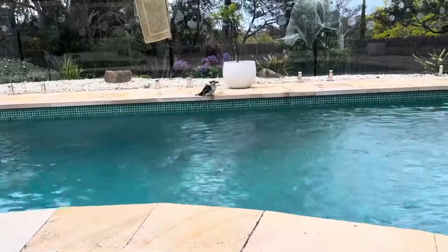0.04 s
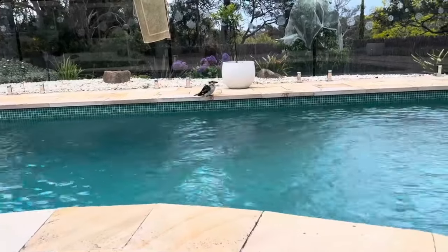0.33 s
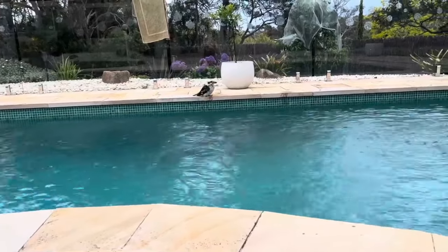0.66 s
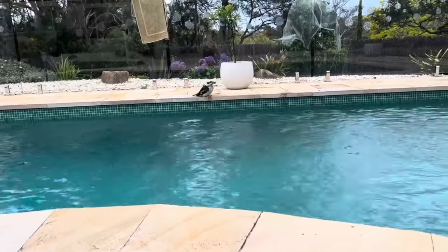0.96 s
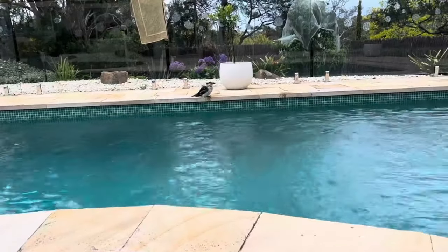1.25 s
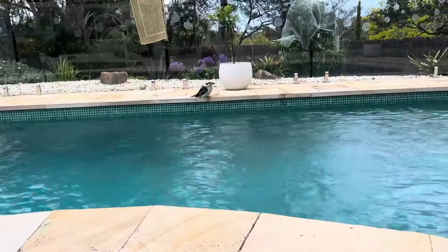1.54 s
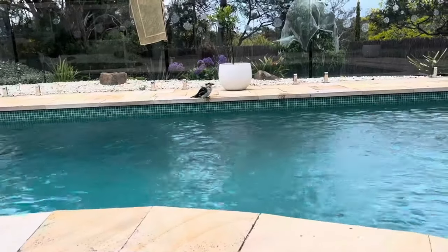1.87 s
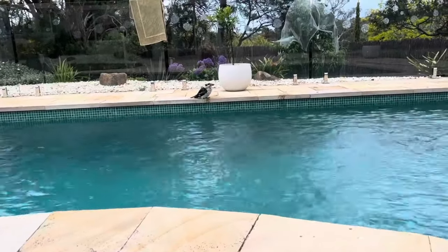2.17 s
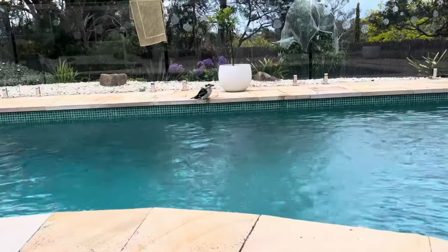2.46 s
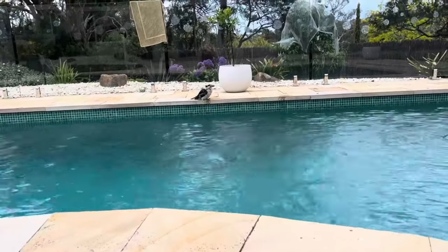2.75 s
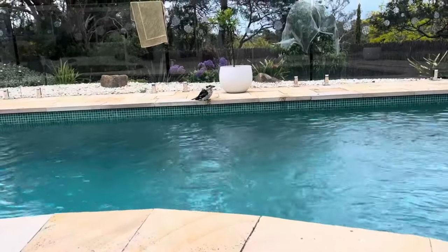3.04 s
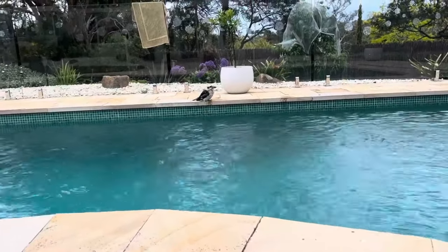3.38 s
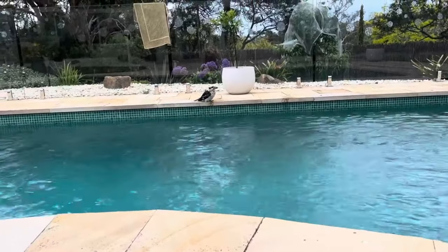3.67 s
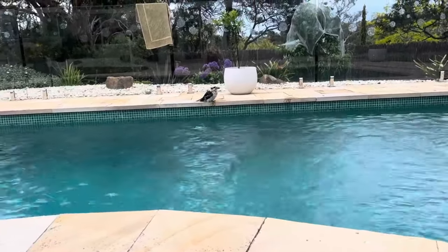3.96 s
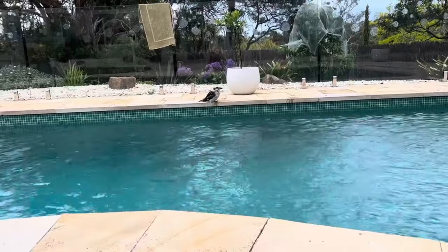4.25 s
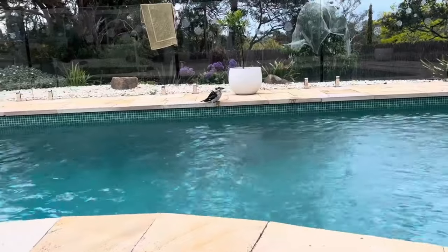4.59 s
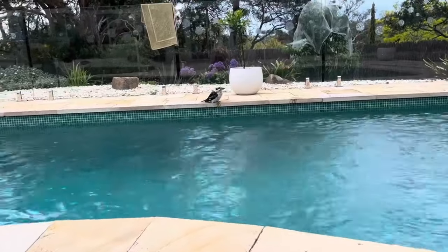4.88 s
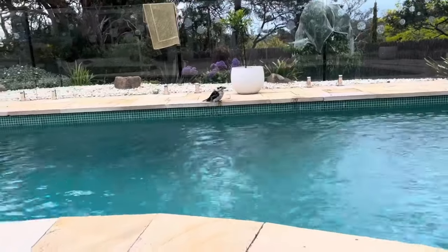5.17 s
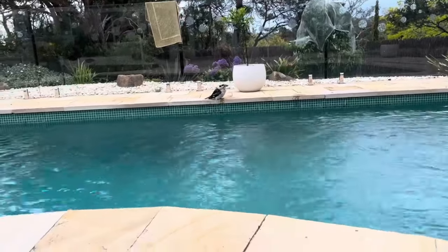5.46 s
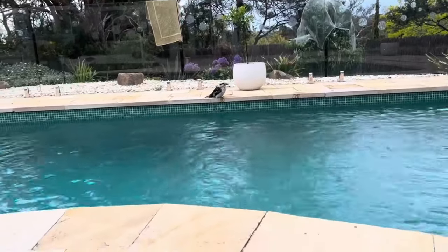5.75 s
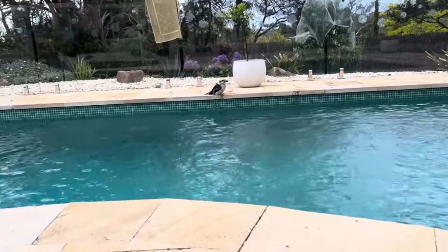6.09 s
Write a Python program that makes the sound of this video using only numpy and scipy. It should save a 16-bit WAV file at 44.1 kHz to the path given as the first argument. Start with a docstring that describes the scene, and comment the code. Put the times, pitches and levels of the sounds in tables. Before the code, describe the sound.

Beside a backyard pool, a pump hums steadily under a low rumble of distant traffic. A small bird repeats short, high, rising chirps that echo off the fence and walls, while a second answers more faintly from deeper in the garden. Faint ticks and soft handling bumps come and go. Near the end the hand-held microphone is briefly rubbed and tapped sharply three times, leaving the background quieter for a moment.

```python
"""Beside a backyard pool a pump hums under distant traffic. From the start a small bird chirps: each
note slurs upward, breaks to a higher pitch and reflects off fence and walls. A second bird answers,
heard mostly as scattered sound. Faint ticks and soft bumps come and go, and a high 'tsip' follows
at about 4 s. Near the end the microphone's case is rubbed, then three sharp taps excite its damped
modes, overload the microphone and pull its gain down."""
import sys
import numpy as np
from scipy import signal
from scipy.fft import rfft, irfft, next_fast_len
from scipy.io import wavfile
from scipy.ndimage import map_coordinates

SR = 44100
rng = np.random.default_rng(int(sys.argv[2]) if len(sys.argv) > 2 else 0)


def generate_wav(signal):
    """Clip the signal to [-1, 1] and save it as 16-bit WAV at the path in sys.argv[1]."""
    frames = np.transpose(np.atleast_2d(signal))
    scaled = np.clip(frames, -1, 1) * 32767
    pcm = np.round(scaled).astype(np.int16)
    wavfile.write(sys.argv[1], SR, pcm)


N = 269892


def amp(db):
    """Amplitude ratio of a level in decibels."""
    return 10 ** (np.asarray(db) / 20)


def unit(x):
    """Normalisation to an rms of 1."""
    return x / np.sqrt(np.mean(x ** 2) + 1e-20)


def along(points, hz):
    """Interpolation of (f/Hz, value) points on a logarithmic frequency axis."""
    f, v = np.transpose(points)
    return np.interp(np.log(hz + 1), np.log(f + 1), v)


def wobble(rate, size=N):
    """Smooth random modulation: a spline through `rate` Gaussian knots a second."""
    knots = rng.standard_normal(int(size * rate / SR) + 4)
    return map_coordinates(knots, [np.arange(size) * rate / SR])


def filtered(x, response):
    """Linear filtering: the spectrum of x is multiplied by a frequency response."""
    n = x.shape[-1]
    m = next_fast_len(n + SR // 8)
    return irfft(rfft(x, m) * response(np.fft.rfftfreq(m, 1 / SR)), m)[..., :n]


def add(track, s, sound):
    """Superposition of a sound on the track, starting at s seconds."""
    i = round(s * SR)
    part = sound[..., max(-i, 0):N - i]
    track[..., max(i, 0):max(i, 0) + part.shape[-1]] += part


def coloured_noise(size, spectrum):
    """Spectral shaping of white noise, at an rms of 1."""
    return unit(filtered(rng.standard_normal(size), lambda hz: amp(along(spectrum, hz))))


# Left-right coherence of the background: f/Hz, correlation coefficient
COHERENCE = [(60, .7), (250, .8), (600, .3), (1000, .15), (3000, .2), (8000, .5), (12000, .9)]
def stereo_noise(spectrum):
    """Partial coherence: the ratio of mid to side noise sets the correlation of the two channels."""
    def response(hz):
        angle = np.arccos(np.clip(along(COHERENCE, hz), -1, 1)) / 2
        return amp(along(spectrum, hz)) * [np.cos(angle), np.sin(angle)]
    mid, side = filtered(rng.standard_normal((2, N)), response)
    return unit(np.array([mid + side, mid - side]))


# Spectra of low rumble, distant traffic and hiss: f/Hz, relative level/dB
RUMBLE = [(12, -55), (20, -37.5), (40, -5), (60, -1.5), (129, -2), (162, -5.5), (209, -7), (241, -8.5),
          (274, -9), (303, -13.5), (335, -12), (600, -34.5), (780, -35), (1320, -120)]
TRAFFIC = [(150, -43), (330, -10), (480, -2.5), (650, -0.5), (900, 3), (1200, 0), (1500, -6), (2000, -12),
           (3000, -23), (4500, -28.5), (7000, -33.5), (12000, -68.5)]
HISS = [(2500, -8.5), (5000, 9), (7000, 2.5), (8500, 1), (9800, -41), (11500, 3.5), (14000, 5),
        (15500, -29), (17000, -45)]
def background(rumble_db=-38.5, traffic_db=-43, hiss_db=-74):
    """Random amplitude modulation: rumble, traffic and hiss each sway about a steady level."""
    rumble = amp(rumble_db + 1.27 * wobble(12)) * stereo_noise(RUMBLE)
    traffic = amp(traffic_db + 1.5 * wobble(7.6)) * stereo_noise(TRAFFIC)
    hiss = amp(hiss_db + wobble(21) + wobble(72)) * stereo_noise(HISS)
    return rumble + traffic + hiss


# Tones of the pump motor: f/Hz, level/dB
PUMP_TONES = [(62, -42.5), (104, -48.5), (202, -52), (274.3, -49)]
def pump(drift_hz=1.35, sway_db=2.5):
    """A motor radiates a line spectrum; each tone wavers slightly in frequency and amplitude."""
    tone = lambda hz: np.sin(2 * np.pi * np.cumsum(hz + drift_hz * wobble(9)) / SR)
    return sum(amp(db) * unit(tone(hz) * amp(sway_db * wobble(7.6))) for hz, db in PUMP_TONES)


# Spectrum of the rasp in a bird's voice: f/Hz, relative level/dB
RASP = [(1500, -26), (4000, 9.5), (5700, -5), (8000, 2.5), (9800, -44.5), (11800, 4.5), (13500, -15),
        (15000, -23.5)]
def chirp(slur_s, top_hz, leap_hz, fundamental_db, octave_db, leap_db, fade_db,
          start_hz=2127, leap_s=0.014, rasp_db=-20, overtone_db=-30):
    """Frequency modulation: a harmonic tone slurs up as its octave fades, then leaps to a whistle."""
    t = np.arange(round((slur_s + leap_s) * SR)) / SR
    u = np.clip(t / slur_s, 0, 1)  # progress of the slur
    v = np.clip((t - slur_s) / leap_s, 0, 1)  # progress of the leap
    slur_hz = top_hz + (start_hz - top_hz) * (1 - u) ** 1.35
    whistle_hz = leap_hz * (1 - 0.041 * (1 - v) ** 2)
    jitter = 1 + .005 * wobble(500, len(t))
    phase = 2 * np.pi * np.cumsum(np.where(t < slur_s, slur_hz, whistle_hz) * jitter) / SR
    ease = lambda share: np.sin(np.pi / 2 * np.minimum(share, 1)) ** 2
    release = ease((1 - u) * 10)
    harmonic_envelope = ease(u / 0.19) * release * amp(1.5 * wobble(260, len(t)) - fade_db * u ** 2)
    fundamental = amp(fundamental_db) * u ** 0.6 * release * np.sin(phase)
    overtones = amp(overtone_db) * (np.sin(3 * phase) + np.sin(5 * phase))
    harmonics = amp(octave_db) * harmonic_envelope * (np.sin(2 * phase) + overtones)
    leap = amp(leap_db) * ease(v / .2) * ease(2 * (1 - v)) * np.sin(phase)
    rasp = amp(octave_db + rasp_db) * np.sin(np.pi * t / t[-1]) * coloured_noise(len(t), RASP)
    return fundamental + harmonics + leap + rasp


# Reverberation time of the garden: f/Hz, T60/s
GARDEN_T60 = [(500, 0.13), (2600, 1), (3800, 0.68), (5000, 0.88), (12000, 0.44)]
def scatter(build_s, clump_db):
    """Reverberation: scattered sound builds up, then each frequency decays at its own rate."""
    size = SR * 2 // 3
    clumps = amp(clump_db * wobble(450, size) * np.linspace(1, 0, size) ** 3)  # uneven, then smooth
    hz, t, bands = signal.stft(clumps * rng.standard_normal((2, size)), SR, nperseg=256)
    decay = amp(-60 * t / along(GARDEN_T60, hz)[:, None])
    tail = signal.istft(bands * decay * (1 - np.exp(-t / build_s)), SR, nperseg=256)[1]
    return tail / np.linalg.norm(tail[0])


# Reflections off paving and walls: delay/s, left level/dB, right level/dB
REFLECTIONS = [(0.01, -7, -3), (.035, -10, -16), (0.046, -15, -20), (0.062, -12.5, -4.5), (.12, -18, -20),
               (0.15, -25, -21), (0.159, -22, -19), (0.231, -27, -22)]
# Colouring of the sound the garden throws back: f/Hz, gain/dB
GARDEN_COLOUR = [(2400, -2.5), (3000, -4), (3800, -2), (4500, 4.5), (5300, 9), (7500, 7.5)]
def poolside_path(direct_db, house_db, house_s=.072, house_highpass_hz=3300):
    """Multipath propagation: direct sound, scatter, soft reflections and a bright echo off the house."""
    response = amp(-2) * scatter(build_s=0.021, clump_db=6)
    for delay, *port_db in REFLECTIONS:
        # uneven surfaces smear each reflection over 5 ms
        facets = irfft(np.exp(2j * np.pi * rng.random((2, SR // 400))))
        add(response, delay - facets.shape[1] / SR / 2, amp(port_db)[:, None] * facets)
    response = filtered(response, lambda hz: amp(along(GARDEN_COLOUR, hz)))
    response[:, 0] += amp(direct_db + np.array([-1, 1]))
    house = np.zeros_like(response)
    house[:, round(house_s * SR)] = amp(house_db + np.array([1.5, -1.5]))
    return response + filtered(house, lambda hz: 1 - 1 / (1 + (hz / house_highpass_hz) ** 6))


# Notes of the near bird: t/s, slur duration/s, slur top f/Hz, leap f/Hz, fundamental level/dB,
# octave level/dB, leap level/dB, octave fade/dB, direct gain/dB, house echo gain/dB
NEAR_NOTES = [(-.028, 0.034, 2785, 3980, -40.5, -48.5, -40, 8, -4.5, -19),
              (0.549, 0.033, 2648, 3825, -37, -43, -34.5, 11, -1.5, -3.5),
              (1.237, 0.036, 2700, 3856, -39.5, -47, -39, 8, -2.5, -7),
              (1.884, 0.046, 2910, 4130, -36, -43.5, -46, 4, -5, -17),
              (2.502, 0.038, 2753, 3720, -34.5, -44, -35.5, 8.5, -1, -19),
              (3.436, 0.033, 2794, 3890, -37, -49.5, -39, 6.5, -0.5, -9),
              (4.239, 0.032, 2690, 3784, -38, -44, -33.5, 10.5, 2, -6),
              (4.84, 0.044, 2780, 3890, -38, -43, -35.5, 7, 0, -5),
              (6.072, 0.04, 2730, 3880, -34.5, -43, -31.5, 3, -1, -6)]
def near_bird(gain_db=1):
    """Convolution with the poolside's impulse response: each note arrives directly and off the walls."""
    out = np.zeros((2, N))
    for s, *note, direct_db, house_db in NEAR_NOTES:
        heard = signal.fftconvolve(chirp(*note)[None], poolside_path(direct_db, house_db), axes=1)
        add(out, s, amp(gain_db) * heard)
    return out


def shrub_path(fence_db, direct_db=-19.5, loss_db_per_s=25, fence_s=0.035, foliage_lowpass_hz=3260):
    """Scattering and absorption: weak direct sound, dense scatter and a fence echo dulled by foliage."""
    response = filtered(scatter(build_s=0.011, clump_db=5), lambda hz: amp(1 + along(GARDEN_COLOUR, hz)))
    response *= amp(-loss_db_per_s * np.arange(response.shape[1]) / SR)
    response[:, 0] += amp(direct_db)
    fence = np.zeros_like(response)
    fence[:, round(fence_s * SR)] = amp(fence_db + np.array([-1, 1]))
    return response + filtered(fence, lambda hz: 1 / (1 + (hz / foliage_lowpass_hz) ** 8))


# Notes of the answering bird: t/s, slur duration/s, slur top f/Hz, leap f/Hz, fundamental level/dB,
# octave level/dB, leap level/dB, octave fade/dB, fence echo gain/dB
ANSWER_NOTES = [(-.012, 0.032, 2773, 3880, -43, -48, -43.5, 8, -10),
                (0.384, 0.044, 2687, 3780, -46, -51, -46, 4, -12),
                (0.865, 0.035, 2714, 3880, -48, -50, -49, 2.5, -12),
                (1.433, 0.042, 2670, 3760, -48.5, -50.5, -43.5, 7, -8),
                (3.215, 0.036, 2580, 3680, -45, -48, -46.5, 10, -10),
                (3.855, 0.041, 2684, 3690, -39.5, -48.5, -48, 12, -3),
                (4.53, .033, 2633, 3740, -40, -49.5, -44.5, 6, -3),
                (4.969, 0.03, 2730, 3780, -38, -46.5, -54, 8, -10),
                (5.561, .031, 2620, 3780, -38, -48.5, -48.5, 5, -10.5)]
def answering_bird(gain_db=1):
    """For a source deep in the garden, the reverberant field outweighs the direct sound."""
    out = np.zeros((2, N))
    for s, *note, fence_db in ANSWER_NOTES:
        heard = signal.fftconvolve(chirp(*note)[None], shrub_path(fence_db), axes=1)
        add(out, s, amp(gain_db) * heard)
    return out


# Small ticks, some in quick runs: t/s, level/dB
TICKS = [(0.25, -45), (0.5486, -45), (1.079, -50), (2.501, -48), (3.116, -53), (3.131, -41), (3.14, -46),
         (3.216, -44), (3.282, -45), (3.763, -54), (4.0843, -39.5), (4.09, -54), (4.224, -34),
         (4.2284, -42), (4.233, -32.5), (4.3638, -46), (4.858, -41), (5.216, -47)]
# Spectrum of ticks and rubs: f/Hz, relative level/dB
SCRATCH = [(1500, -20), (3500, 1), (6000, 3.5), (8200, 5), (9900, -15.5), (12000, 2.5), (14500, -1.5),
           (16000, -18)]
def ticks(gain_db=-2, rise_s=0.00053, t60_s=0.0065, tail_db=-24, tail_t60_s=0.44):
    """Double-slope decay: a sharp burst of noise dies quickly and leaves a faint hissing tail."""
    out, t = np.zeros(N), np.arange(SR // 4) / SR
    decay = amp(-60 * t / t60_s) + amp(tail_db - 60 * t / tail_t60_s)
    envelope = (1 - np.exp(-t / rise_s)) * decay
    for s, db in TICKS:
        add(out, s, amp(db + gain_db) * envelope * coloured_noise(len(t), SCRATCH))
    return out


# Soft pushes on the hand-held case: t/s, level/dB
BUMPS = [(0.598, -23.5), (0.968, -30.5), (4.22, -30.5), (4.62, -18.5), (4.94, -27.5), (5.468, -24.5),
         (6.071, -24)]
def bumps(hz=56, peak_s=0.01):
    """Heavily damped oscillation: each push gives a low pulse of a cycle or two."""
    out, t = np.zeros(N), np.arange(SR // 5) / SR
    pulse = t / peak_s * np.exp(1 - t / peak_s) * np.sin(2 * np.pi * hz * t)
    for s, db in BUMPS:
        add(out, s, amp(db) * pulse)
    return out


def tsip(start_s=4.079, length_s=0.011, db=-36, start_hz=4770, end_hz=6420, blur_t60_s=0.12, tail_db=-9):
    """Scattering by nearby leaves blurs a bird's very short upward sweep into a dry 'tsip'."""
    out, u = np.zeros((2, N)), np.linspace(0, 1, round(length_s * SR))
    phase = 2 * np.pi * np.cumsum(start_hz + (end_hz - start_hz) * u) / SR
    note = amp(db) * np.sin(np.pi * u) * np.sin(phase)
    tail = scatter(build_s=.01, clump_db=1)
    leaves = rng.standard_normal(tail.shape) * amp(-60 * np.arange(tail.shape[1]) / SR / blur_t60_s)
    response = leaves / np.linalg.norm(leaves[0]) + amp(tail_db) * tail
    add(out, start_s, signal.fftconvolve(note[None], response, axes=1))
    return out


# Slides on the case: t/s, attack/s, decay onset/s, T60/s, level/dB, spectral tilt/(dB per octave)
RUBS = [(5.177, 0.02, 0.12, .12, -60.5, -8), (5.306, .003, 0.066, 0.066, -52.5, 7)]
def rubs(grain_db=2, pivot_hz=8000):
    """Sliding friction makes grainy noise that swells, holds and dies away."""
    out, t = np.zeros(N), np.arange(SR // 3) / SR
    octaves = lambda hz: np.clip(np.log2((hz + 1) / pivot_hz), -2, 2)
    for s, attack, hold, t60, db, tilt in RUBS:
        level_db = db - 60 * np.maximum(t - hold, 0) / t60 + grain_db * wobble(147, len(t))
        noise = filtered(coloured_noise(len(t), SCRATCH), lambda hz: amp(tilt * octaves(hz)))
        add(out, s, amp(level_db) * np.minimum(t / attack, 1) * unit(noise))
    return out


# Taps on the case: t/s, level/dB, thud f/Hz, thud level/dB, knock f/Hz, knock level/dB, snap f/Hz,
# clack f/Hz, clack level/dB, edge f/Hz, edge level/dB, crack level/dB, echo gain/dB, rebound gain/dB
TAPS = [(5.3143, -10, 408, -12.5, 980, -14.5, 1390, 2270, -15, 3540, -2.5, -8, -11.5, -16),
        (5.507, 5.5, 477, -24, 1037, -23, 1964, 3400, -16.5, 2660, -11.5, -17, -12.5, -7),
        (5.685, 3, 465, -20, 1325, -14, 1610, 2550, -14, 3300, -1.5, -5, -18, -15)]
# Spectra of a tap's first crack and of its echo: f/Hz, relative level/dB
CRACK = [(1000, -2), (8000, 9), (9800, -6), (11500, 1), (16000, -1.5)]
TAP_ECHO = [(500, -17), (2500, 1), (5000, -7), (8000, -10), (10000, -32), (13000, -11), (15500, -41)]
def taps(crack_peak_s=0.00062, rattle_t60_s=0.035, rebound_s=.00156, echo_rise_s=.025, echo_t60_s=0.68):
    """Impact excites the case's damped modes, the low thud peaking last; the yard reverberates."""
    out, t, echo_t = np.zeros((2, N)), np.arange(SR // 20) / SR, np.arange(SR // 2) / SR
    pan = np.array([[-1], [1]])  # times a level in dB: lowers the left, raises the right
    swell = lambda peak_s: (t / peak_s * np.exp(1 - t / peak_s)) ** 2
    mode = lambda hz, cycles_to_peak: np.sin(2 * np.pi * hz * t) * swell(cycles_to_peak / hz)
    echo_envelope = (1 - np.exp(-echo_t / echo_rise_s)) * amp(-60 * echo_t / echo_t60_s)
    for (s, db, thud_hz, thud_db, knock_hz, knock_db, snap_hz, clack_hz, clack_db,
         edge_hz, edge_db, crack_db, echo_db, rebound_db) in TAPS:
        thud = amp(thud_db + 5.5 * pan) * mode(thud_hz, 1.18)
        knock = amp(knock_db + 7.5 * pan) * mode(knock_hz, 2)
        upper = mode(snap_hz, 1) + amp(clack_db) * mode(clack_hz, 4.4) + amp(edge_db) * mode(edge_hz, 2)
        crack = amp(crack_db - 3.5 * pan) * swell(crack_peak_s) * coloured_noise(len(t), CRACK)
        dull_noise = unit(signal.lfilter(*signal.butter(1, 3000, fs=SR), rng.standard_normal(len(t))))
        rattle = dull_noise * amp(-30 - 60 * t / rattle_t60_s)
        tap = amp(db + 1.1 * pan) * (thud + knock + upper + crack + rattle)
        rebound = -amp(rebound_db) * tap  # the case springs back, which sounds hollow
        for when, (left, right) in ((s, tap), (s + rebound_s, rebound)):
            add(out[0], when + 3 / SR, left)  # reaches the left port a little later
            add(out[1], when, right)
        wash = echo_envelope * rng.standard_normal((2, len(echo_t)))
        echo = filtered(wash, lambda hz: amp(along(TAP_ECHO, hz)))
        add(out, s, amp(db + crack_db + echo_db - 11) * echo)
    return out


# Imbalance of the microphone ports: f/Hz, left minus right level/dB
PORT_BALANCE = [(60, -1), (350, -1.5), (800, 0.4), (2500, -2), (3700, 3.5), (4800, 10), (8000, 2),
                (11000, 0.5)]
def scene(right_lag_s=.00036):
    """Superposition at two unlike ports; structure-borne taps and rubs bypass their imbalance."""
    left, right = background() + pump()
    # street and pump lie to the left, so their sound reaches the right port later
    right = filtered(right, lambda hz: np.exp(-2j * np.pi * hz * right_lag_s))
    garden = np.array([left, right]) + near_bird() + answering_bird() + tsip() + ticks() + bumps()
    at_ports = filtered(garden, lambda hz: amp(along(PORT_BALANCE, hz) * np.array([[.5], [-.5]])))
    return at_ports + taps() + rubs()


def record(dry, threshold_db=-13, release_db_per_s=10, depth=0.8, lag_s=.002, lowpass_hz=16100):
    """Automatic gain control ducks too late for a tap, which clips; the gain then recovers slowly."""
    t, window = np.arange(N) / SR, SR // 250
    power = signal.lfilter(np.ones(window) / window, 1, np.mean(dry ** 2, axis=0))
    excess_db = np.maximum(10 * np.log10(abs(power) + 1e-12) - threshold_db, 0)
    duck_db = np.maximum.accumulate(depth * excess_db + release_db_per_s * t) - release_db_per_s * t
    late_duck_db = np.interp(t - lag_s, t, duck_db)
    clipped = np.clip(dry * amp(-late_duck_db), -1, 1)
    return filtered(clipped, lambda hz: 1 / (1 + (hz / lowpass_hz) ** 60))


dry = scene()
out = record(dry)
generate_wav(out)
```